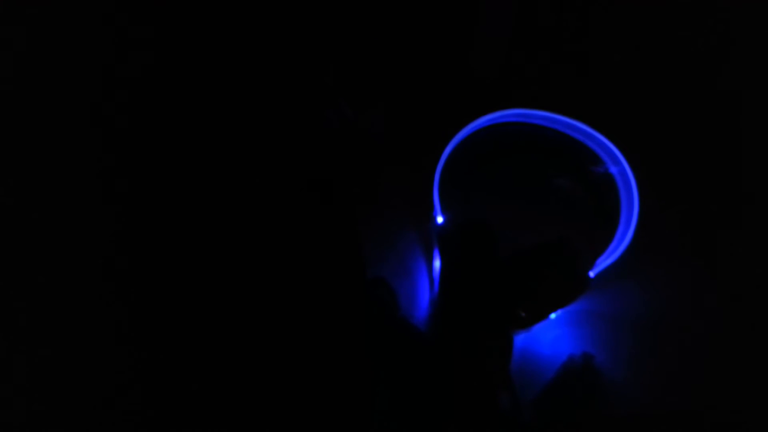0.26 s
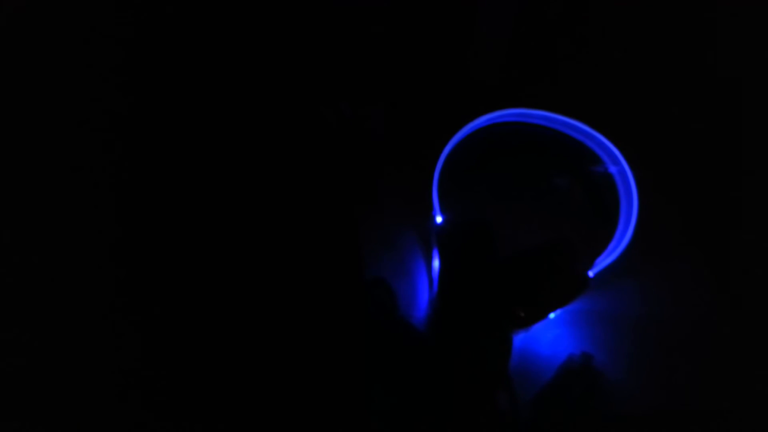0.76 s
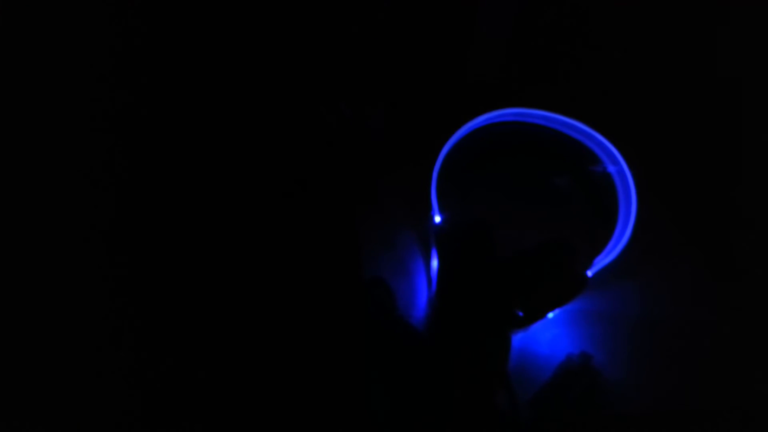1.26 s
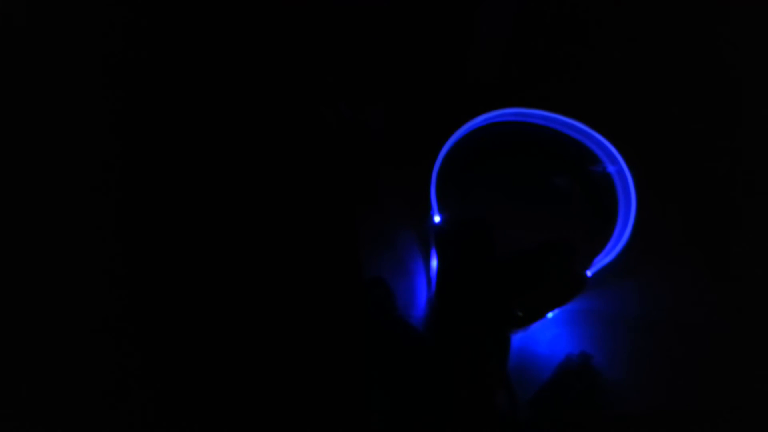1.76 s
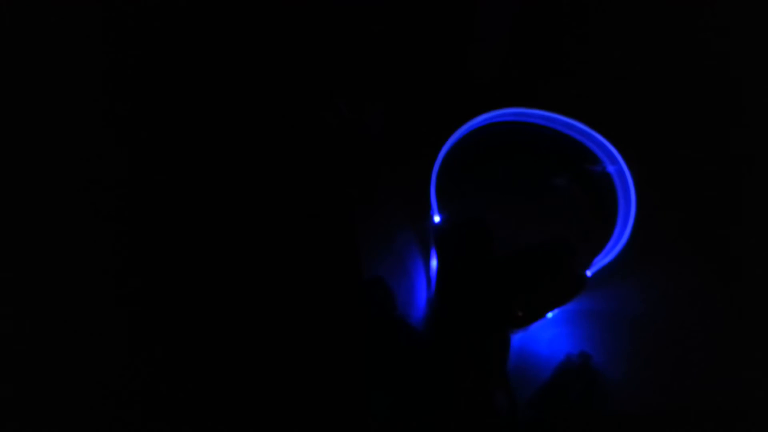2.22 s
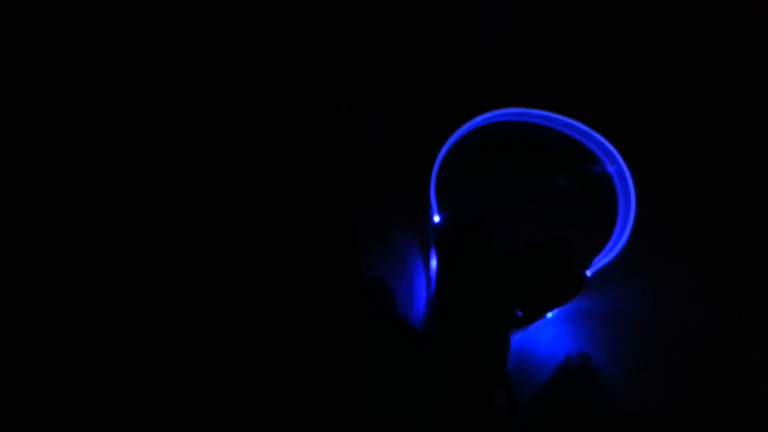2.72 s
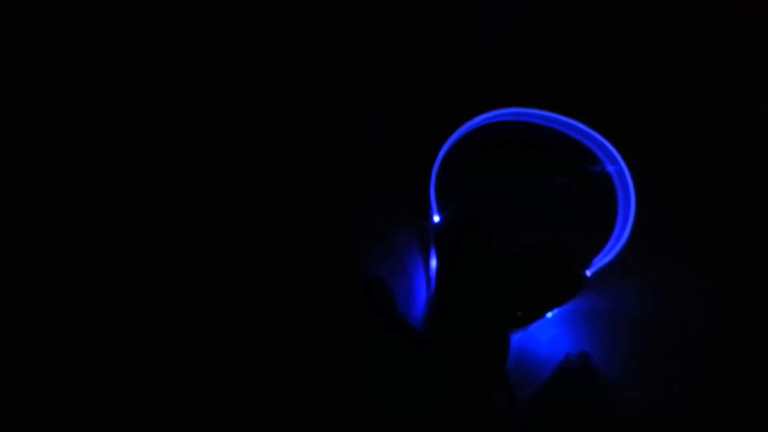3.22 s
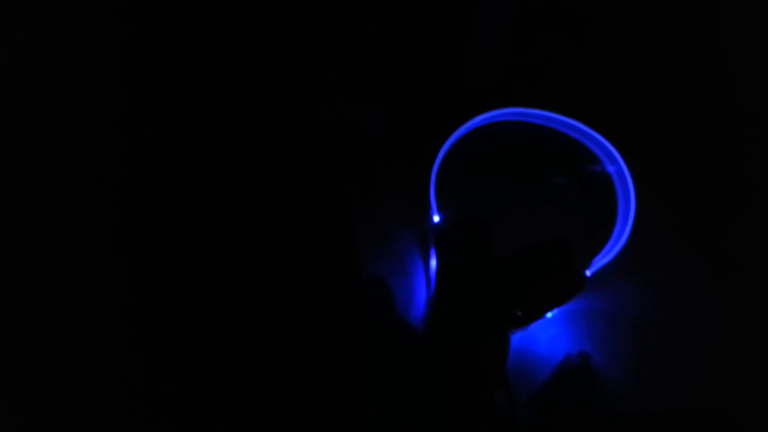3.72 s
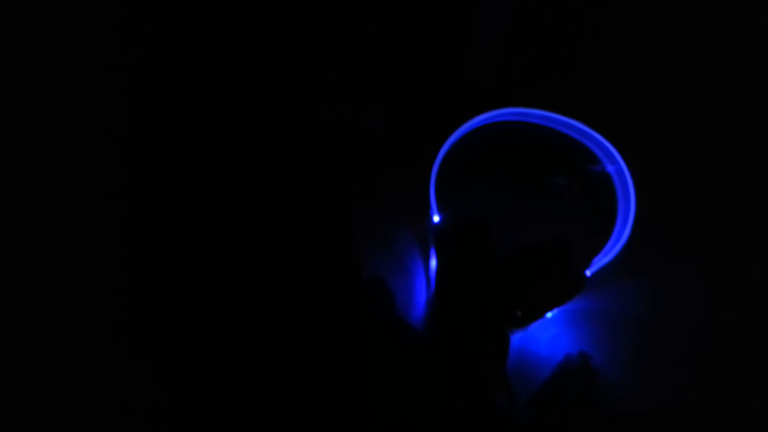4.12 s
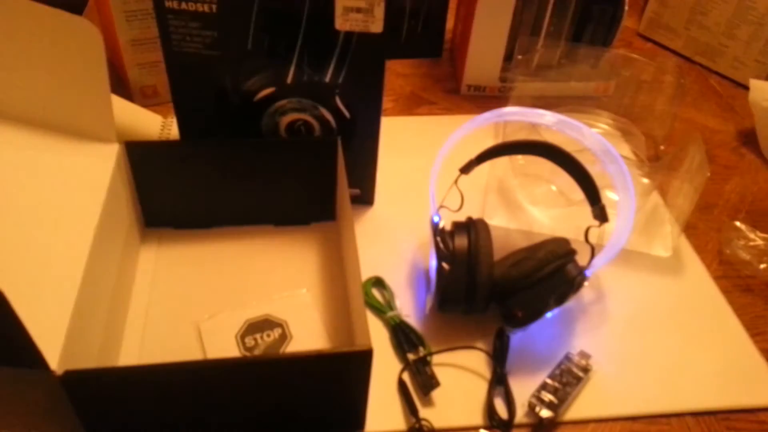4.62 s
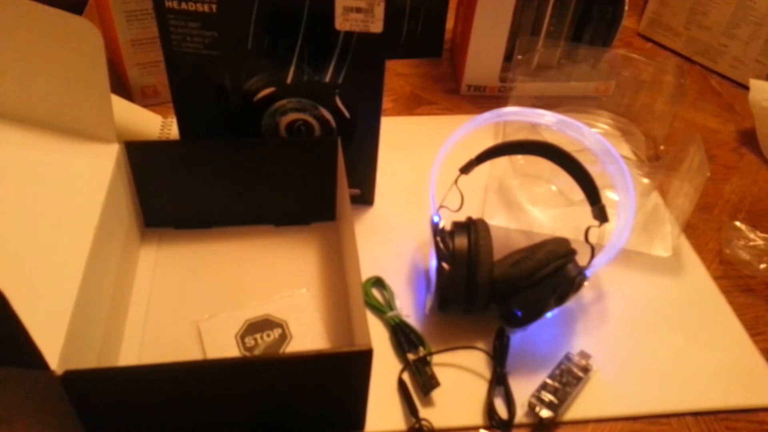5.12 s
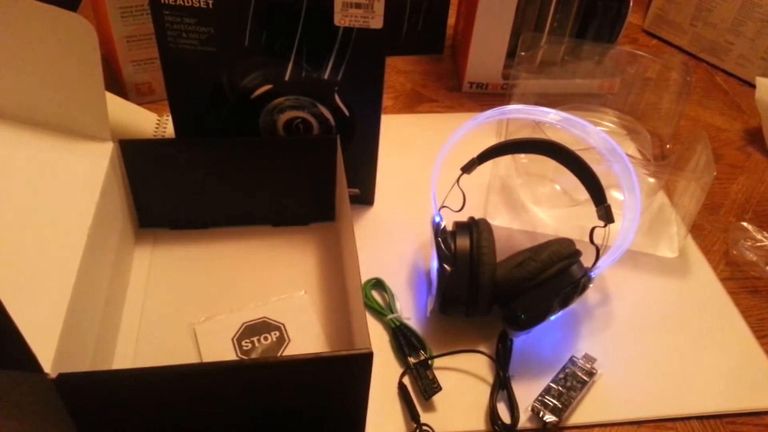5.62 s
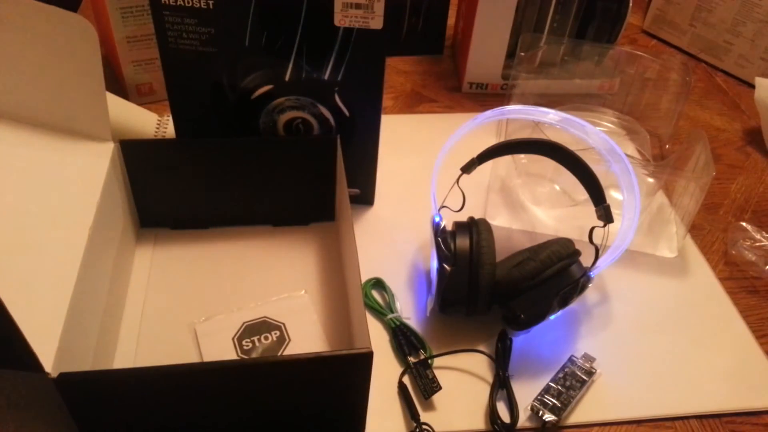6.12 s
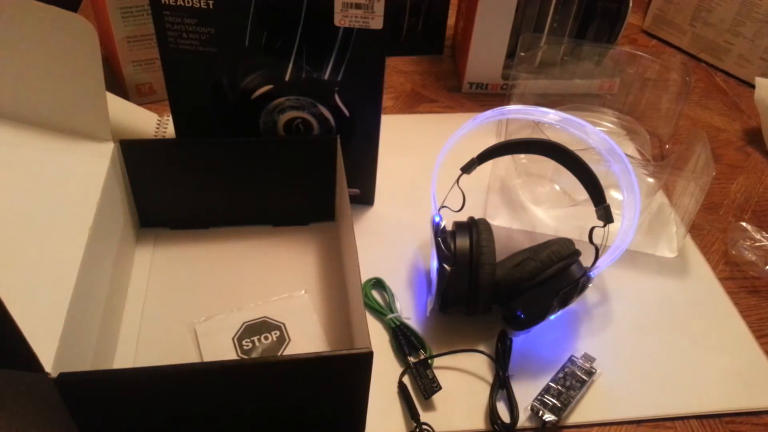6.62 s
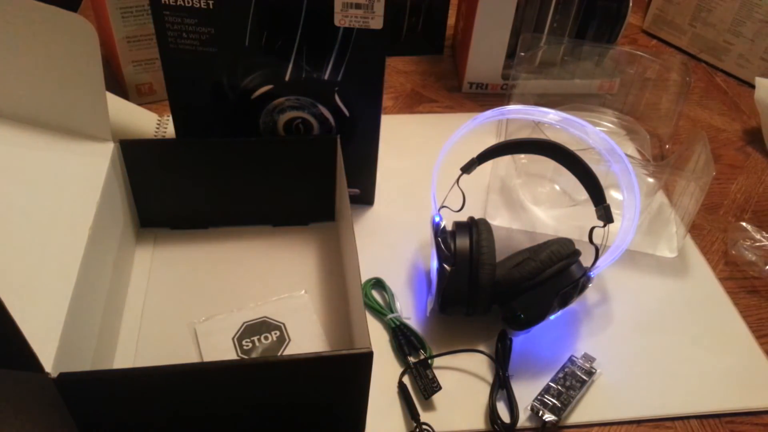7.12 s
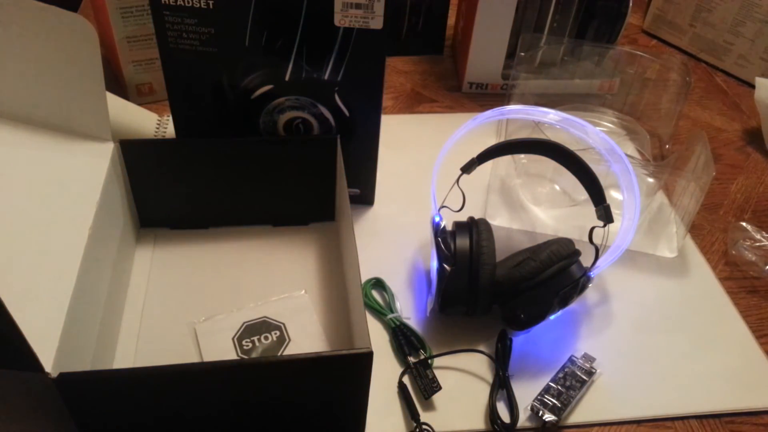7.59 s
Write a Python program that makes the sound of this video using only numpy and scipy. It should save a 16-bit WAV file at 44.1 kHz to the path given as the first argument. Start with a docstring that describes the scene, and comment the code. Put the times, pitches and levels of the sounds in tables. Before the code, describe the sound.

In a bare room, hard soles click and scuff, a chair leg scrapes briefly, and a light switch snaps loudly midway before footsteps return.

```python
"""A bare room: someone in hard-soled slippers pushes a chair back, walks across, flips the light switch
and walks back. Contacts are short noisy pushes ringing resonances: soles click, wood knocks dully,
the switch snaps and bounces. Soles and chair legs rub, as grainy noise through resonances; clothes rustle
over a murmur, as coloured noise; a low sine hum comes and goes. Walls echo and a diffuse tail follows
each contact and rub; a small mono microphone adds hiss."""
import sys
import numpy as np
from scipy import signal
from scipy.fft import rfft, irfft, next_fast_len
from scipy.io import wavfile
from scipy.ndimage import map_coordinates

SR = 44100
rng = np.random.default_rng(int(sys.argv[2]) if len(sys.argv) > 2 else 0)


def unload_audio(sound):
    """Save the sound as a 16-bit wav file, at the path given as the first command line argument."""
    columns = np.transpose(np.atleast_2d(sound))
    # keep every value between -1 and 1, then stretch to whole-number steps
    steps = np.round(np.clip(columns, -1, 1) * 32767)
    wavfile.write(sys.argv[1], SR, steps.astype(np.int16))


N = 346272

# Colour of microphone hiss, also of the airy treble of cloth. Each row: frequency in Hz, density in dB per Hz.
HISS_COLOUR = [(2000, -8), (5000, -12), (8000, 2), (13000, 3.5), (15000, -1.5)]
ROUGH = 0.4  # norm of the rough contact against a first touch of 1


def amp(db):
    """Gain of a level in dB."""
    return 10 ** (np.asarray(db) / 20)


def unit(x):
    """Scaled to rms 1."""
    return x / np.sqrt(np.mean(x ** 2) + 1e-20)


def along(points, hz):
    """(Hz, value) points read on a log frequency axis."""
    point_hz, values = np.transpose(points)
    return np.interp(np.log(hz + 1), np.log(point_hz + 1), values)


def curves(rows):
    """One value per sample for each column after the time in seconds."""
    knots_s, *columns = np.transpose(rows)
    return [np.interp(np.arange(N) / SR, knots_s, column) for column in columns]


def wobble(rate_hz):
    """A smooth random curve, rate_hz knots a second."""
    knots = rng.standard_normal(int(N * rate_hz / SR) + 4)
    return map_coordinates(knots, [np.arange(N) * rate_hz / SR])


def filtered(x, response):
    """x through a complex response of frequency, padded so that the ringing does not wrap."""
    size = next_fast_len(len(x) + SR // 4)
    spectrum = rfft(x, size) * response(np.fft.rfftfreq(size, 1 / SR))
    return irfft(spectrum, size)[:len(x)]


def body(modes, order=1):
    """Causal response of (Hz, width Hz, dB) resonances of alternating sign; higher order, steeper flanks."""
    def response(hz):
        total = 0
        for k, (mode_hz, width_hz, db) in enumerate(modes):
            resonance = 1j * hz * width_hz / (mode_hz ** 2 - hz ** 2 + 1j * hz * width_hz)
            total = total + (-1) ** k * amp(db) * resonance ** order
        return total
    return response


def noise(colour):
    """Noise of rms 1 with a given (Hz, dB per Hz) colour."""
    return unit(filtered(rng.standard_normal(N), lambda hz: amp(along(colour, hz))))


def rubbing(modes, grain_db, size=N):
    """Dense tiny slips, bunched into grains of a few ms, ring a body; rms 1."""
    grains = amp(grain_db * np.clip(wobble(350)[:size], -2, 2))
    return unit(filtered(rng.standard_normal(size) * grains, body(modes)))


def add(track, start_s, sound):
    """Mixes a sound into the track from start_s."""
    part = track[max(round(start_s * SR), 0):][:len(sound)]
    part += sound[:len(part)]


def blow(modes, spread_s, order=1):
    """A hard first touch and a decaying rough contact ring a body; energy equals 5 ms at rms 1."""
    t = np.arange(SR // 20) / SR
    push = np.exp(-t / spread_s) * rng.standard_normal(len(t))
    push *= ROUGH / np.linalg.norm(push)
    push[0] = 1
    ring = filtered(push, body(modes, order=order))
    return ring / np.linalg.norm(ring) * np.sqrt(SR / 200)


def scuffs():
    """Soles slide: pressure swells and lets go, driving sole, grit and floor boards alike."""
    # Each row: start in seconds, level in dB, rise in seconds, fall in seconds, sole ring in Hz,
    # grit in dB over the ring, low rub in dB over the ring.
    slides = [(0, -27, 0.00085, 0.017, 1650, -2.5, -25), (.03, -34, 0.027, 0.016, 1560, -3.5, -24),
              (.26, -49, 0.014, 0.011, 2020, -3, -12), (.377, -47, 0.0028, 0.038, 1570, -10, -1),
              (1.788, -39, .01, 0.019, 2220, -4.5, -29), (2.149, -34.5, 0.014, 0.01, 1630, -6, -24),
              (2.429, -56.5, .0051, .0068, 2110, -5, -13), (2.6, -40, 0.025, 0.01, 1120, -1, -20),
              (2.68, -42.5, 0.018, 0.0093, 1890, -7, -12), (2.978, -53.5, 0.045, 0.056, 2340, -1, -6),
              (3.409, -52.5, 0.024, 0.054, 3200, 1, -6), (4.21, -50, 0.0089, 0.02, 1830, -8, -13),
              (5.16, -59.5, 0.027, .038, 1480, -11, 2), (5.309, -56.5, 0.011, 0.011, 2500, -1, -4),
              (5.531, -38.5, 0.023, .011, 1710, -0.5, -15), (5.714, -51, 0.0035, 0.013, 2080, -6, -20),
              (5.971, -40.5, 0.0096, 0.014, 3270, 0, -8), (6.02, -45, 0.0063, 0.016, 1340, -26, -18),
              (6.13, -57.5, 0.022, 0.018, 1950, -3, -2), (6.31, -33.5, 0.036, .005, 1830, -4, -37),
              (6.46, -45, 0.014, 0.013, 1740, -14, -0.5), (6.617, -47.5, 0.078, 0.024, 2210, 2.5, -0.5),
              (6.651, -44, 0.019, .024, 730, -20, -27), (7.2, -46, 0.018, .0077, 1610, -9, -21),
              (7.437, -53.5, 0.038, 0.047, 2620, -3, -12), (7.6, -53, 0.026, 0.12, 1600, -4, -4.5),
              (7.719, -44.5, 0.01, 0.016, 2250, -6.5, -8.5), (7.798, -50, .025, 0.033, 1450, -26, -18)]
    # Modes of a sliding sole. Each row: multiple of its ring, width as a multiple of the ring, level in dB.
    sole_modes = [(1, .45, 6.5), (2.3, 1.2, -4)]
    # Dust under the sole. Each row: frequency in Hz, width in Hz, level in dB.
    grit_modes = [(4500, 1100, 11), (8470, 4600, 8), (13400, 6000, 3)]
    # The floor boards. Each row: frequency in Hz, width in Hz, level in dB.
    board_modes = [(300, 154, 1), (685, 870, -6)]
    sole, grit, boards = np.zeros((3, N))
    t = np.arange(SR // 4) / SR
    for start_s, db, rise_s, fall_s, ring_hz, grit_db, low_db in slides:
        pressure = np.where(t < rise_s, (t / rise_s) ** 0.56, np.exp((rise_s - t) / fall_s))
        modes = [(ring_hz * k, ring_hz * width, mode_db) for k, width, mode_db in sole_modes]
        add(sole, start_s, amp(db) * pressure * rubbing(modes, grain_db=3.0, size=len(t)))
        add(grit, start_s, amp(db + grit_db) * pressure)
        add(boards, start_s, amp(db + low_db) * pressure)
    return sole + grit * rubbing(grit_modes, grain_db=3.5) + boards * rubbing(board_modes, grain_db=1.5)


def murmur_and_cloth():
    """Coloured noises: unsteady murmur of the house, and rustle whose airy treble varies less."""
    # The person moving. Each row: time in seconds, cloth rustle in dB, room murmur in dB.
    moving = [(0, -35, -50), (.26, -54.5, -54.5), (.61, -55.5, -57), (.95, -60.5, -58),
              (1.27, -57.5, -57.5), (1.57, -39, -52), (1.73, -47, -56), (2.16, -51.5, -53),
              (2.9, -58.5, -55.5), (3.21, -52, -53.5), (3.93, -55, -54), (4.66, -53.5, -49),
              (4.85, -54, -50), (5.93, -57.5, -53.5), (6.34, -58, -57.5), (6.58, -45.5, -44.5),
              (6.84, -54.5, -55), (7.85, -50, -55)]
    # Each row: frequency in Hz, density in dB per Hz.
    murmur_colour = [(12, -55), (20, -37), (97, -18.5), (136, -8.5), (167, -3), (444, 0.5), (555, 0.5),
                     (1080, -7), (1200, -10.5), (1560, -6), (2640, -120)]
    # Each row: frequency in Hz, density in dB per Hz.
    cloth_colour = [(400, -24), (900, -1.5), (1900, -1), (3200, -6), (5500, -11.5), (9000, -22),
                    (15000, -70)]
    cloth_db, murmur_db = curves(moving)
    sheen_db = -62.5 + 0.5 * (cloth_db + 55)
    murmur = amp(murmur_db + 1.5 * wobble(11)) * noise(murmur_colour)
    cloth = amp(cloth_db + 1.8 * wobble(12)) * noise(cloth_colour)
    return murmur + cloth + amp(sheen_db) * noise(HISS_COLOUR)


def hum():
    """A sine of wavering pitch that comes and goes."""
    # Each row: time in seconds, peak level in dB.
    hum_levels = [(0, -55), (.3, -84), (2.86, -68.5), (3.5, -61.5), (4.26, -66), (4.4, -67), (4.63, -52.5),
                  (4.81, -73), (4.94, -56.5), (5.14, -56), (5.33, -72), (5.46, -52.5), (5.6, -50.5),
                  (5.93, -72), (6.12, -63.5), (6.25, -77), (7.45, -72), (7.85, -65)]
    centre_hz, waver_hz = 141, 1.42
    turns = np.cumsum(centre_hz + waver_hz * wobble(6)) / SR
    return amp(curves(hum_levels)[0]) * np.sin(2 * np.pi * turns)


def clicks():
    """Sharp contacts of soles and things: each rings at its own pitch and cracks in the treble."""
    # Each row: start in seconds, level in dB, ring in Hz, treble in dB over the ring.
    contacts = [(0.197, -41.5, 1870, -21), (0.375, -49, 1140, -27), (0.4513, -38, 904, -40),
                (0.676, -68, 1190, -33), (0.7851, -52, 1150, -15), (1.155, -56, 1670, -15),
                (1.2504, -39.5, 1370, -23), (1.5617, -35, 1240, -43), (1.9189, -30.5, 1600, -54),
                (2.1477, -27.5, 3030, -7.5), (2.4295, -47.5, 2163, -9), (2.594, -31.5, 1400, -46),
                (2.681, -47.5, 1950, -35), (3.207, -51, 1670, -33), (3.3233, -52.5, 3900, -36),
                (4.2051, -47.5, 1500, -45), (5.0301, -48.5, 1130, -50), (5.1584, -49.5, 1330, -37),
                (5.196, -48, 1570, -21), (5.538, -40, 2290, -27), (5.5503, -37, 1830, -24),
                (5.713, -43.5, 2700, -8), (5.9746, -36.5, 2340, -33), (6.256, -53.5, 1510, -35),
                (6.316, -44, 1740, -23), (6.342, -45, 1727, -32), (6.4704, -42, 1670, -9),
                (7.0823, -34.5, 1460, -56), (7.199, -40, 1870, -18), (7.226, -48, 1440, -30),
                (7.7296, -46, 1520, -25)]
    width_ratio, crack_hz, crack_width_hz = 1.05, 7360, 7000  # ring width over pitch; treble crack
    out = np.zeros(N)
    for start_s, db, ring_hz, treble_db in contacts:
        modes = [(ring_hz, width_ratio * ring_hz, 0), (crack_hz, crack_width_hz, treble_db)]
        add(out, start_s, amp(db) * blow(modes, spread_s=0.0015, order=2))
    return out


def knocks():
    """Dull contacts on wood: each rings at its own pitch and thuds in the boards; treble softened."""
    # Each row: start in seconds, level in dB before softening, ring in Hz, thud in dB over the ring.
    contacts = [(0.39, -49, 480, -6), (0.435, -26.5, 660, -4.5), (0.675, -43.5, 810, -7),
                (1.215, -46, 300, -12), (1.231, -44, 320, -13), (1.919, -34.5, 480, -16),
                (2.156, -39.5, 805, -28), (2.595, -30, 754, -22), (4.149, -37, 653, -9.5),
                (4.209, -42, 337, -24), (5.029, -49, 480, -10), (5.136, -48.5, 520, -2),
                (5.533, -46, 380, -3), (6.049, -46, 570, -11), (6.315, -43.5, 516, -10),
                (6.475, -44, 268, -12), (6.527, -42.5, 299, -13), (6.633, -39, 370, -8),
                (7.08, -39.5, 630, -9.5), (7.218, -40.5, 494, -9.5), (7.675, -43, 334, -12)]
    width_ratio, thud_hz, thud_width_hz, soft_hz = 0.38, 192, 110, 1490  # ring width over pitch; thud; cutoff
    out = np.zeros(N)
    for start_s, db, ring_hz, thud_db in contacts:
        modes = [(thud_hz, thud_width_hz, thud_db), (ring_hz, width_ratio * ring_hz, 0)]
        add(out, start_s, amp(db) * blow(modes, spread_s=0.0034))
    return filtered(out, lambda hz: 1 / (1 + 1j * hz / soft_hz))


def chair():
    """The legs stick and slip unevenly, shaking the frame, leg tips and dust below."""
    # Legs dragging. Each row: time in seconds, level in dB before the judder.
    drag = [(1.19, -70), (1.234, -43.5), (1.252, -64), (1.268, -48.5), (1.366, -46.5), (1.558, -32),
            (1.572, -27.5), (1.674, -55), (1.85, -66)]
    # Each row: frequency in Hz, width in Hz, level in dB.
    frame_modes = [(133, 16.3, -14), (206, 32, -9), (312, 48, -4), (470, 93, -3), (570, 83, 0),
                   (713, 103, -0.5)]
    # Leg tips. Each row: frequency in Hz, width in Hz, level in dB.
    tip_modes = [(1090, 400, 2.5), (1710, 640, -2)]
    # Grit under the legs. Each row: frequency in Hz, width in Hz, level in dB.
    dust_modes = [(2560, 890, 2.5), (4860, 3300, -8.5), (9000, 1500, -13)]
    tips_db = -7  # over the frame
    level_db, = curves(drag)
    t = np.arange(N) / SR
    dragging = (t > drag[0][0]) * (t < drag[-1][0])
    judder = amp(3.04 * np.clip(wobble(90), -3, 1.5)) * dragging
    legs = rubbing(frame_modes, grain_db=1.5) + amp(tips_db) * rubbing(tip_modes, grain_db=6.5)
    dust_db = -57 + 0.82 * (level_db + 48)  # grows more slowly than the drag
    return judder * (amp(level_db) * legs + amp(dust_db) * rubbing(dust_modes, grain_db=8.0))


def switch():
    """The rocker rubs ever harder, lets go, snaps over, lands and bounces; the wall plate rings each time."""
    # Rocker lets go, snaps over, lands. Each row: start in seconds, level in dB.
    strikes = [(4.4781, -35.5), (4.4807, -16), (4.4863, -20)]
    # The wall plate. Each row: frequency in Hz, width in Hz, level in dB.
    plate_modes = [(435, 106, 0), (1006, 217, 5), (2200, 960, 2.5), (4400, 1500, -0.5), (9000, 3000, -8),
                   (12300, 3200, -17.5)]
    creep_s, creep_db = 0.0022, -24  # time constant; level reached at the snap
    bounce_s, loss_db = 0.0046, 8  # time between bounces; loss per bounce
    out = np.zeros(N)
    t = np.arange(-SR // 50, 0) / SR  # time before the snap
    snap_s = strikes[1][0]
    creep = np.exp(t / creep_s) * rubbing(plate_modes[:4], grain_db=-1, size=len(t))
    add(out, snap_s + t[0], amp(creep_db) * creep)
    land_s, land_db = strikes[-1]
    bounces = [(land_s + k * bounce_s, land_db - k * loss_db) for k in range(1, 4)]
    for start_s, db in [*strikes, *bounces]:
        add(out, start_s, amp(db) * blow(plate_modes, spread_s=0.0019))
    return out


def room(x, wet_db, build_s, scatter):
    """Wall echoes, then a diffuse tail with frequency-dependent decay; both redrawn every 1/12 s."""
    # Decay. Each row: frequency in Hz, t60 in seconds.
    decay = [(150, 0.74), (500, 0.71), (1000, 0.58), (3000, 0.55), (6000, 0.5), (10000, 0.45),
             (14000, 0.51)]
    # First echoes. Each row: delay in seconds before scatter, level in dB.
    walls = [(.0052, -7), (.0098, -10.5), (0.0147, -12.5), (0.0203, -12), (0.024, -13), (0.029, -16)]
    early_db, early_s = 3, 0.03  # dense scatter from near furniture: over the tail; time constant
    size = SR // 12
    t = np.arange(SR) / SR
    swell = (1 - np.exp(-t / build_s)) * amp(early_db * np.exp(-t / early_s))  # reflections pile up
    out = np.zeros(N)
    for start in range(0, N, size):
        hz, frames_s, z = signal.stft(rng.standard_normal(SR + 256), SR, nperseg=256)
        fade = amp(-60 * frames_s / along(decay, hz)[:, None])
        tail = swell * signal.istft(z * fade, SR, nperseg=256)[1][:SR]
        tail *= amp(wet_db) / np.linalg.norm(tail)
        for delay_s, db in walls:
            shifted_s = delay_s * (1 + scatter * rng.uniform(-1, 1))
            tail[round(shifted_s * SR)] += amp(db)
        add(out, start / SR, signal.fftconvolve(x[start:start + size], tail))
    return x + out


def boom(x):
    """The lowest room mode rings on."""
    # Each row: frequency in Hz, width in Hz, level in dB.
    boom_modes = [(136.6, 5.9, 19.5)]
    return filtered(x, body(boom_modes))


def scene():
    """Near sounds through room and bass cut, plus background; the same in both channels."""
    near = scuffs() + clicks() + knocks() + chair() + switch()
    heard = room(near, wet_db=7.0, build_s=0.00088, scatter=0.06) + boom(near)
    # the microphone takes little bass from the air
    thin = filtered(heard, lambda hz: (1j * hz / (110 + 1j * hz)) ** 2)
    return np.tile(thin + murmur_and_cloth() + hum(), (2, 1))


def record(dry):
    """One microphone feeds both channels: it adds hiss, then a sharp band limit."""
    hiss_db, top_hz = -64.5, 14660
    mono = filtered(dry[0] + amp(hiss_db) * noise(HISS_COLOUR), lambda hz: hz < top_hz)
    return np.array([mono, mono])


dry = scene()
out = record(dry)
unload_audio(out)
```